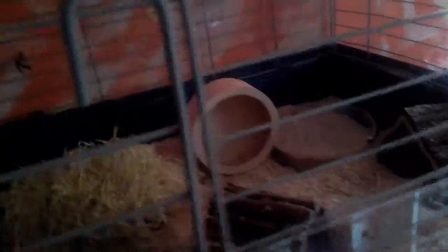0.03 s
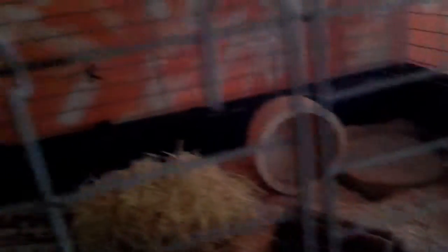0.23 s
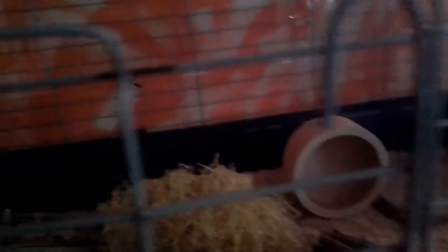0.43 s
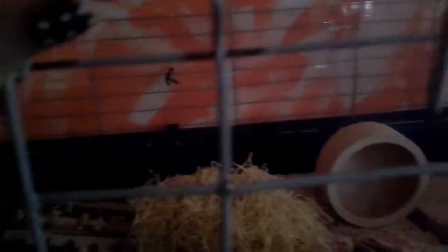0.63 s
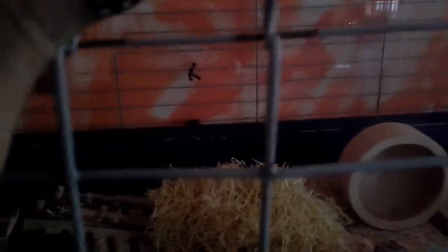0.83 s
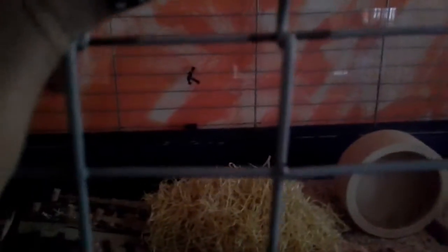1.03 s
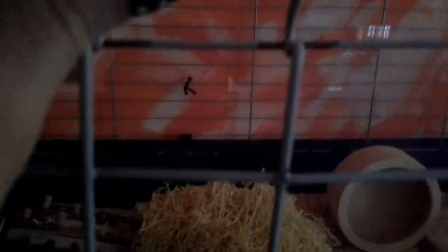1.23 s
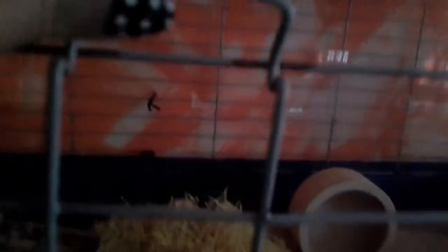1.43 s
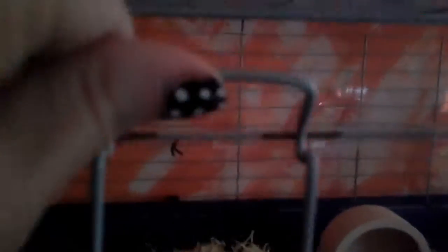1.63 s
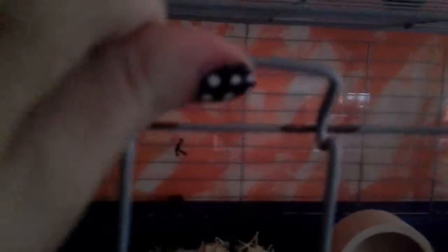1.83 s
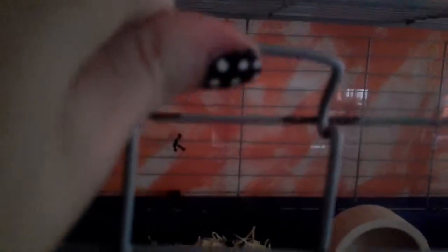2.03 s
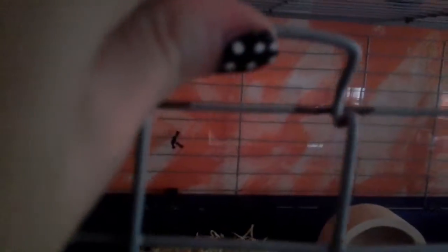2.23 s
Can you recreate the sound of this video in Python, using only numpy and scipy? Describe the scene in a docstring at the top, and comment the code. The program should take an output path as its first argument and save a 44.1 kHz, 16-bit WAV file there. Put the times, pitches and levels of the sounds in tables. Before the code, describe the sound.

Short metal clanks come from a small pet cage as its wire door is swung shut, bumped and latched by hand. Light wire rattles and faint ringing fall between the blows, heard up close in a quiet room.

```python
"""A quiet room, one microphone close to a small pet cage whose wire door is swung shut and latched by hand.
The door clanks against the bars and settles with a tick, a bar is struck, the frame takes a dull knock
and the catch snaps over. Each blow rings a few clear wire modes over the dense jangle of the mesh and
shakes the hollow plastic tray; light touches of wire on wire fall between. A faint afterring and a
treble sizzle trail the blows into the soft room tone."""
import sys
import numpy as np
from scipy import signal
from scipy.fft import rfft, irfft
from scipy.io import wavfile

SR = 44100
rng = np.random.default_rng(int(sys.argv[2]) if len(sys.argv) > 2 else 0)


def dump(signal):
    """Clip the signal to [-1, 1] and save it as 16-bit WAV at the path in sys.argv[1]."""
    limited = np.clip(np.atleast_2d(signal).T, -1, 1)
    pcm = np.round(limited * 32767).astype(np.int16)
    wavfile.write(sys.argv[1], SR, pcm)


N = 105840

# blows and rebounds: start_s, part, mesh_gain_db, mode_gain_db, tray_gain_db, rise_s, length_ratio
BLOWS = [(0.2211, "door", -8, -13.5, -16, 0.0026, 0.99), (0.225, "door", -5.5, -2, -4.5, 0.0018, 1),
         (0.2540, "door", -9, -16, -5, 0.0022, 1), (0.343, "door", -20, -27, -21, 0.013, 0.58),
         (0.401, "door", -25.5, -17, -15, 0.009, 0.3), (0.6513, "bar", -0.5, 0.5, -8.5, 0.0084, .92),
         (0.68, "bar", -7.5, -27, -10, .003, 1), (0.6955, "bar", -13, -26, -16.5, 0.0016, 0.65),
         (0.796, "bar", -23, -36, -22, 0.0024, 0.31), (0.829, "bar", -23, -34, -35, 0.0023, .45),
         (1.462, "frame", -0.5, -0.5, -27, 0.0048, 0.99), (1.7565, "catch", 2.5, 1, -15, 0.0082, 0.65),
         (1.867, "catch", -21, -15, -31, 0.0046, 0.44)]
# light touches of wire on wire: start_s, gain_db, rise_s, length_ratio, tilt_db_per_octave
WIRE_TOUCHES = [(0.505, -1, 0.003, 0.26, -0.5), (0.560, 0.5, 0.0018, 1, 0), (0.58, -9.5, 0.0024, 0.69, 3),
                (1.337, -9, 0.014, 0.98, 2), (1.432, -11.5, 0.0072, 0.96, 0.5),
                (1.594, -10.5, 0.0053, 0.74, -1), (1.618, -11.5, 0.0045, 0.39, 2),
                (1.641, -10, 0.003, 0.78, 1.5), (2.033, -11.5, 0.0052, 0.61, 1)]

# clear modes of each struck part, before a blow's gain: pitch_hz, level_db
DOOR_RING = [(1142, -44), (1203, -68), (1322, -71), (1361, -40), (2227, -41), (2375, -40.5), (2411, -39),
             (2437, -39), (2530, -44), (2893, -60), (2917, -43), (3197, -42), (3620, -74), (4208, -48),
             (4245, -37.5)]
THIN_WIRE_RING = [(4613, -47), (5084, -67), (5241, -53), (5391, -47), (5418, -44), (5474, -45), (6562, -56),
                  (6595, -36), (7169, -42), (7224, -47), (8311, -42.5), (9364, -61), (9970, -41)]
BAR_RING = [(818, -53.5), (1002, -52), (1250, -49.5), (1298, -70), (1359, -50.5), (1738, -48.5),
            (1860, -54), (1940, -45), (2036, -57), (2372, -43), (2485, -46), (2557, -40.5), (3590, -46),
            (4815, -42.5), (6121, -48), (7750, -54)]
FRAME_RING = [(180, -65.5), (283, -62.5), (406, -54), (642, -61), (665, -56), (759, -59.5), (833, -54),
              (1156, -50), (1770, -61), (1850, -66), (1966, -60), (4447, -68.5)]
CATCH_RING = [(769, -55.5), (835, -59), (1146, -50.5), (1317, -53), (1349, -48.5), (1643, -46.5),
              (1659, -48.5), (1737, -64), (1970, -47), (2100, -55), (2240, -50), (2290, -76), (2869, -66),
              (3117, -57.5)]
# hollow modes of the plastic tray under the cage, before a blow's gain: pitch_hz, level_db
TRAY_RING = [(123, -60.5), (135, -67), (184, -62.5), (224, -65), (278, -71), (360, -54.5), (392, -56.5),
             (410, -51), (497, -56.5), (690, -53)]
# free wires that sing on once the bar is struck: pitch_hz, level_db
FREE_WIRE_RING = [(997, -68), (1860, -64.5), (2557, -61.5)]

# jangle of the mesh for each kind of contact, before its gain: frequency_hz, density_db_per_hz
DOOR_JANGLE = [(70, -102), (125, -85), (250, -88), (390, -70.5), (700, -75), (1300, -63.5), (1800, -68),
               (2500, -64.5), (4300, -68), (4850, -74), (5400, -65), (5900, -73), (6700, -68.5),
               (7700, -79), (9800, -76), (10800, -87), (15500, -92)]
BAR_JANGLE = [(60, -102), (115, -81), (250, -75), (500, -74.5), (900, -70), (2000, -68), (2550, -66),
              (3050, -76.5), (3600, -71.5), (4300, -80), (6200, -82.5), (7000, -88.5), (7800, -92),
              (10500, -102), (15500, -106)]
FRAME_JANGLE = [(80, -105), (180, -85.5), (400, -82.5), (700, -83.5), (1000, -87.5), (1250, -82.5),
                (1500, -92), (1900, -81.5), (3300, -99), (5600, -100), (8000, -108), (15500, -112)]
CATCH_JANGLE = [(90, -103), (240, -82), (550, -85), (800, -80.5), (1400, -76), (2200, -75.5), (2900, -84.5),
                (3500, -94.5), (4400, -95), (6500, -102), (15500, -107)]
TOUCH_JANGLE = [(60, -108), (125, -86), (200, -99), (350, -88), (750, -85.5), (1300, -86.5), (1550, -92.5),
                (1900, -84), (2900, -91), (3900, -96.5), (4800, -103), (6000, -100.5), (9000, -107),
                (15500, -114)]

# usual decay of mesh and clear modes, scaled by the length and sustain ratios: frequency_hz, t60_s
MESH_DECAY = [(120, 0.4), (400, 0.59), (1100, 0.49), (2400, .32), (4500, 0.26), (8000, 0.23), (14000, 0.13)]
MODE_DECAY = [(400, 0.5), (1200, 0.51), (2500, .38), (5000, 0.23), (10000, 0.091)]
# colour of the whole cage's afterring in the room: frequency_hz, relative_db
AFTERRING_COLOUR = [(100, -19.5), (200, -4), (400, -0.5), (700, -3), (1150, -1.5), (1400, 4), (1600, -9.5),
                    (1820, 2.5), (2030, 4), (2230, -23), (2600, -1.5), (3200, -14), (8000, -23)]
# room tone and hiss, before the swell: frequency_hz, density_db_per_hz
ROOM_SPECTRUM = [(30, -113), (70, -112), (140, -116), (300, -110), (450, -105), (1300, -103.5),
                 (2000, -106), (2700, -109), (3400, -114), (5500, -117.5), (8500, -115), (12500, -118),
                 (15500, -120)]
# level of the middle range below the hiss over time, lifted at the start by a sound already dying away by 0.2
# s, then drifting gently: # time_s, gain_db
ROOM_TONE_SWELL = [(0, 8.5), (.18, 2.5), (1.0, 0.5), (1.6, 3.5), (2.1, 0), (2.4, 0.5)]

# what sounds when each part is struck: modes, jangle, sustain_ratio
PARTS = {"door": (DOOR_RING + THIN_WIRE_RING, DOOR_JANGLE, 0.99),
         "bar": (BAR_RING, BAR_JANGLE, 1.17),
         "frame": (FRAME_RING, FRAME_JANGLE, 0.72),
         "catch": (CATCH_RING, CATCH_JANGLE, 0.89)}

SETTLE_S = 0.422   # the door comes to rest
TIME_S = np.arange(N) / SR
BIN_HZ = np.arange(N // 2 + 1) * SR / N


def from_db(db):
    """Decibels to gain."""
    return 10 ** (np.asarray(db) / 20)


def at_hz(points, hz):
    """Read a table on a log-frequency axis."""
    frequencies, values = np.transpose(points)
    return np.interp(np.log(np.maximum(hz, 1)), np.log(frequencies), values)


def noise_spectrum(density_db):
    """Spectrum of a noise with the given dB per Hz."""
    return rfft(rng.standard_normal(N)) * np.sqrt(SR / 2) * from_db(density_db)


def decay(start_s, t60_s):
    """A sudden onset that falls 60 dB in t60_s."""
    age_s = TIME_S - start_s
    return (age_s >= 0) * np.exp(-np.log(1000) * np.abs(age_s) / t60_s)


def envelope(start_s, rise_s, t60_s, hz, slow_below_hz=740):
    """A quick swell, then a decay; in the bass the cage takes longer to start moving."""
    swell_s = rise_s * (1 + slow_below_hz / hz)
    return np.clip((TIME_S - start_s) / swell_s, 0, 1) * decay(start_s, t60_s)


def room_tone(hiss_from_hz=1960):
    """The room behind the cage: steady hiss above a soft middle range; a fading sound, already dying as the
    scene begins, lifts that range until about 0.2 s, then it drifts slowly up and down."""
    noise = noise_spectrum(at_hz(ROOM_SPECTRUM, BIN_HZ))
    low_share = 1 / (1 + (BIN_HZ / hiss_from_hz) ** 4)
    swell = from_db(np.interp(TIME_S, *np.transpose(ROOM_TONE_SWELL)))
    return swell * irfft(noise * low_share, N) + irfft(noise * (1 - low_share), N)


def ring(start_s, rise_s, length, modes, waver_depth=0.26, waver_hz=24.4):
    """Clear modes of a struck part, each wavering slowly at random."""
    out = 0
    for hz, level_db in modes:
        knots = rng.standard_normal(128)
        waver = 1 + waver_depth * np.interp((TIME_S - start_s) * waver_hz, np.arange(len(knots)), knots)
        tone = np.sin(2 * np.pi * (hz * TIME_S + rng.random()))
        t60_s = at_hz(MODE_DECAY, hz) * length
        out += from_db(level_db) * waver * tone * envelope(start_s, rise_s, t60_s, hz)
    return out


def mesh_jangle(start_s, rise_s, length, density_db, crack_from_hz=3200):
    """Countless close modes of the mesh: a treble crack on contact, then each band dies at its own rate."""
    jangle = noise_spectrum(density_db)
    crack = 0.81 * decay(start_s, t60_s=0.025)
    centres_hz = [hz for hz, _ in MESH_DECAY]
    out = 0
    for (hz, t60_s), weights in zip(MESH_DECAY, np.eye(len(centres_hz))):
        band_share = at_hz(list(zip(centres_hz, weights)), BIN_HZ)   # neighbouring bands crossfade
        band = irfft(jangle * band_share, N)
        treble_share = hz ** 2 / (hz ** 2 + crack_from_hz ** 2)
        out += band * (envelope(start_s, rise_s, t60_s * length, hz) + treble_share * crack)
    return out


def clanks(damping_db=-7, damping_s=0.036):
    """Each blow rings its part and shakes mesh and tray; the door is damped once it settles."""
    damping = from_db(damping_db * np.clip((TIME_S - SETTLE_S) / damping_s, 0, 1))
    out = 0
    for start_s, part, mesh_db, mode_db, tray_db, rise_s, length in BLOWS:
        modes, jangle, sustain = PARTS[part]
        wires = from_db(mode_db) * ring(start_s, rise_s, length * sustain, modes)
        tray = from_db(tray_db) * ring(start_s, rise_s, length, TRAY_RING)
        mesh = mesh_jangle(start_s, rise_s, length, at_hz(jangle, BIN_HZ) + mesh_db)
        out += (wires + tray + mesh) * (damping if part == "door" else 1)
    return out


def afterring(cage, gain_db=-17.5, t60_s=2.1, swinging_db=-2.5):
    """The blows' energy spreads over the whole cage and dies slowly as a diffuse mid-range ring."""
    tail = irfft(noise_spectrum(at_hz(AFTERRING_COLOUR, BIN_HZ)), N)
    # the loose, swinging door passes less of its energy to the cage
    passed = cage * from_db(swinging_db * (TIME_S < SETTLE_S))
    pole = np.exp(-2 * np.log(1000) / (t60_s * SR))
    energy = signal.lfilter([1 - pole], [1, -pole], passed ** 2)
    return from_db(gain_db) * np.sqrt(energy) * tail / np.std(tail)


def sizzle(cage, gain_db=-22, t60_s=0.35, from_hz=2000):
    """A faint treble hiss that rises with each blow and lingers after it."""
    pole = np.exp(-np.log(1000) / (t60_s * SR))
    motion = signal.lfilter([1 - pole], [1, -pole], np.abs(cage))
    highpass = signal.butter(2, from_hz, "high", fs=SR, output="sos")
    return from_db(gain_db) * motion * signal.sosfilt(highpass, rng.standard_normal(N))


def door_tick(gain_db=-50, centre_hz=7900):
    """The door comes to rest with one tiny, bright contact."""
    burst = rng.standard_normal(N) * decay(SETTLE_S, t60_s=0.014)
    return from_db(gain_db) * signal.lfilter(*signal.iirpeak(centre_hz, Q=2, fs=SR), burst)


def wire_touches(pivot_hz=1500):
    """Light contacts of wire on wire only stir the mesh, each with its own treble tilt."""
    octaves = np.log2(np.maximum(BIN_HZ, 100) / pivot_hz)
    density_db = at_hz(TOUCH_JANGLE, BIN_HZ)
    return sum(mesh_jangle(start_s, rise_s, length, density_db + gain_db + tilt * octaves)
               for start_s, gain_db, rise_s, length, tilt in WIRE_TOUCHES)


def singing_wires(sustain=3.86):
    """A few free wires ring on quietly after the first blow to the bar."""
    start_s, *_, rise_s, length = next(blow for blow in BLOWS if blow[1] == "bar")
    return ring(start_s, rise_s, length * sustain, FREE_WIRE_RING)


def scene():
    """The cage close to one microphone, the quiet room behind it."""
    cage = clanks() + door_tick() + wire_touches()
    return (room_tone() + cage + afterring(cage) + sizzle(cage) + singing_wires())[None]


def record(dry):
    """The microphone's signal, with the top cut steeply."""
    cutoff_hz = 15800
    lowpass = signal.ellip(10, 0.1, 70, cutoff_hz, fs=SR, output="sos")
    return signal.sosfilt(lowpass, dry)


dry = scene()
out = record(dry)
dump(out)
```